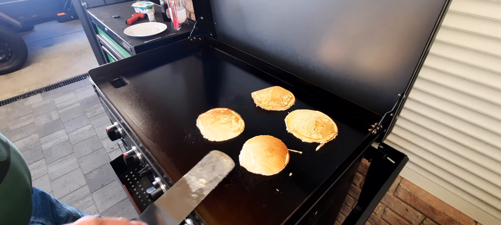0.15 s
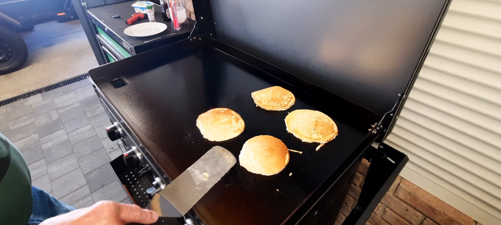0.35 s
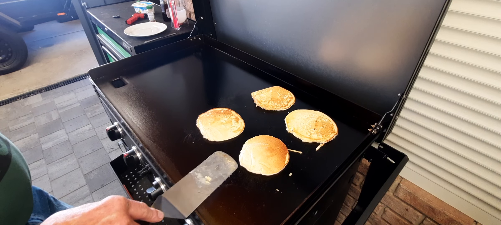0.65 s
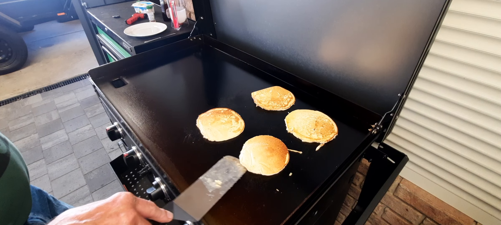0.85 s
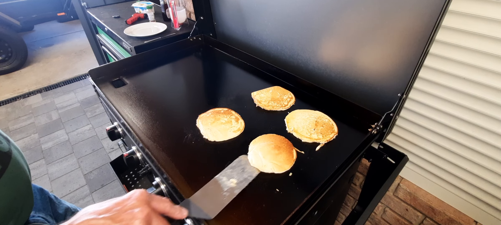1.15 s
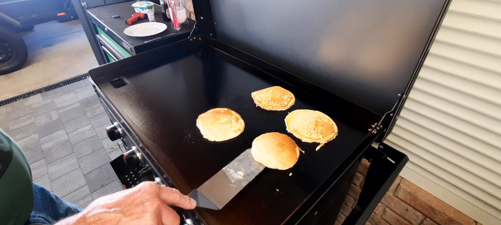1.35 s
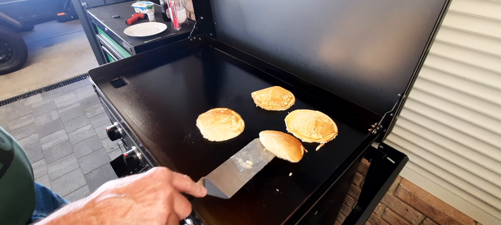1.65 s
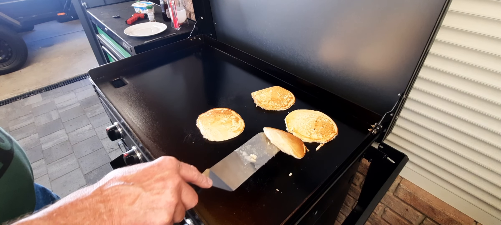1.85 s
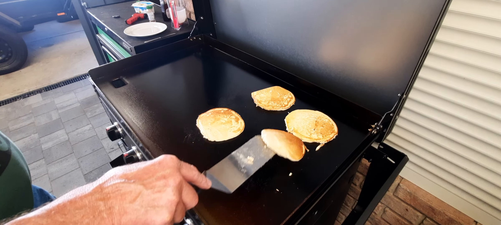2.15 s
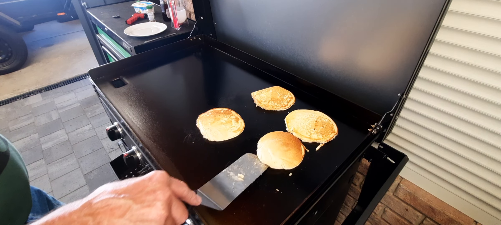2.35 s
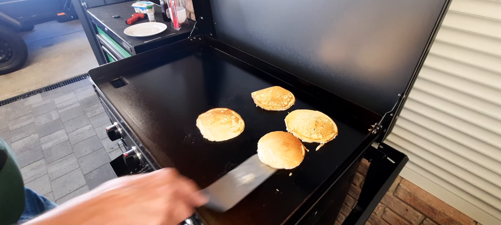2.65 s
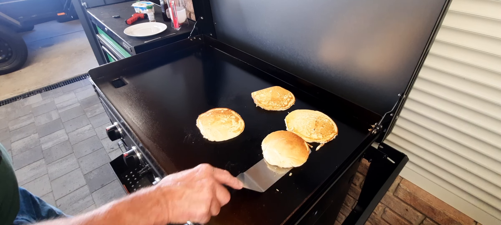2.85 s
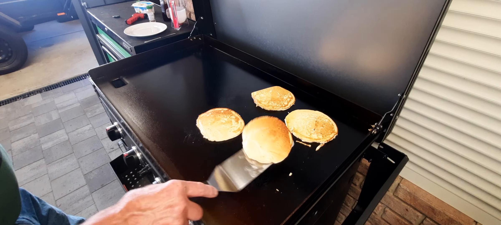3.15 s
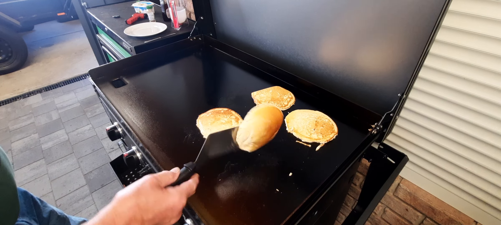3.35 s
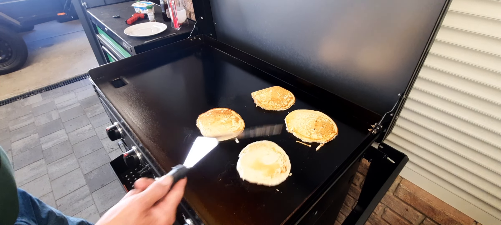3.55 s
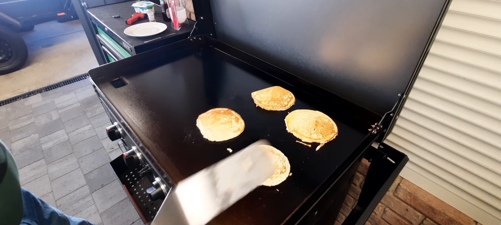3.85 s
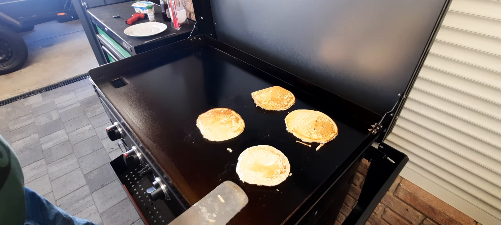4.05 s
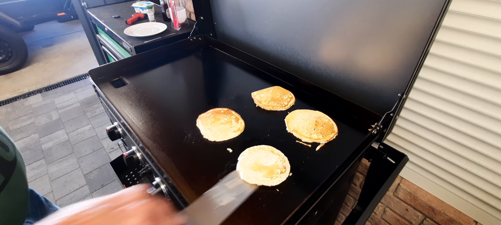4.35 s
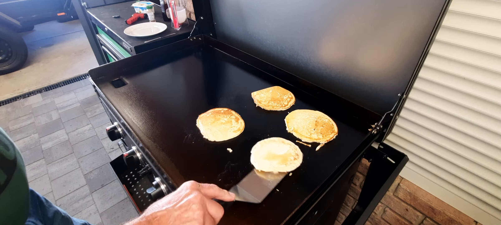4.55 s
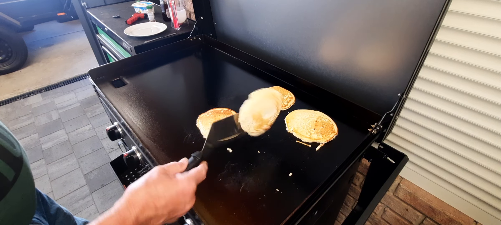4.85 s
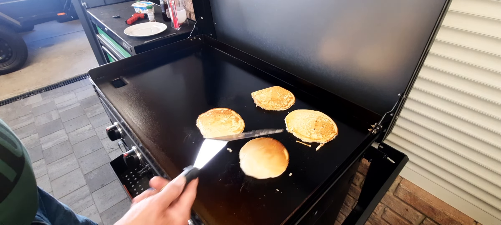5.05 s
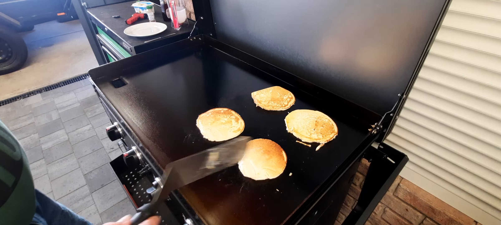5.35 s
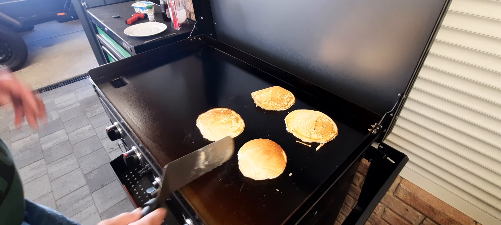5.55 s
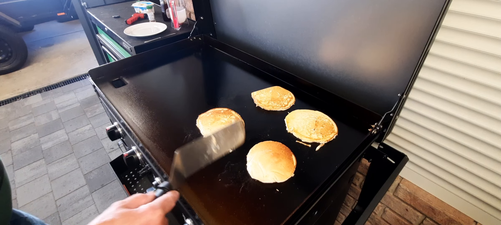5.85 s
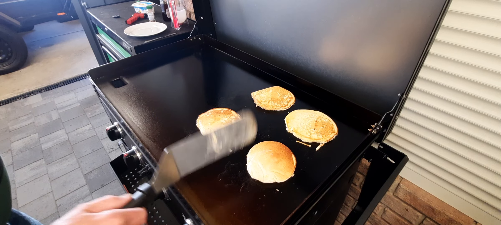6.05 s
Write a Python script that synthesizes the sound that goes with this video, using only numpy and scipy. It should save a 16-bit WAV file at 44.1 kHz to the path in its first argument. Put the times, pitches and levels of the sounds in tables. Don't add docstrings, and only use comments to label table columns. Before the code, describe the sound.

A close stereo pickup on a walled patio, leaning right. Gas burners run throughout, a quiet flickering low rumble with thin hiss and faint whistles. At 0.6 and 0.8 s a steel blade lands softly on the griddle plate, followed by faint drags until 1.3 s. Dull bun nudges pass near 1.7 and 2.0 s. At 2.36 s comes a very sharp steel tap, a lighter one at 2.44, then a bright gritty scrape at 2.7 with a short metallic ring and wall echo. A bun thuds faintly at 3.3 and slaps crisply at 3.56, settling softly to 4.0. A firm tap at 4.1 and a soft one at 4.26 precede two quick bright scrapes at 4.36 and 4.45, the second brightest. The loudest bun slap falls at 5.07. Around 5.5 a light touch, then the blade lands heavily flat and drags dully, fading by 6.1.

```python
import sys
import numpy as np
from scipy import signal
from scipy.fft import rfft, irfft, next_fast_len
from scipy.io import wavfile

SR = 44100
rng = np.random.default_rng(int(sys.argv[2]) if len(sys.argv) > 2 else 0)


def master_out(mix):
    frames = np.transpose(np.atleast_2d(mix))
    ceiling = np.clip(frames, -1, 1)
    pcm = np.round(ceiling * 32767).astype(np.int16)
    wavfile.write(sys.argv[1], SR, pcm)


def gain_from_decibels(decibels):
    exponent = np.asarray(decibels, float) / 20
    return 10 ** exponent


N = 273953
USUAL_DB = -50
LOAD_SWING = 0.41
CLICK_DB = 5.5


# start t/s, fastest t/s, end t/s, edge hiss level/dB, load on the plate level/dB
SLIDES = [
    (0.765, 0.796, 0.89, -54.5, -71),
    (0.82, 0.882, 0.93, -55, -72),
    (0.87, 1.05, 1.122, -58, -63),
    (1.18, 1.235, 1.292, -53, -51.5),
    (2.42, 2.441, 2.52, -64.5, -58.5),
    (2.5, 2.62, 3.105, -65.5, -59.5),
    (2.655, 2.72, 2.826, -24, -47),
    (4.24, 4.27, 5.63, -69.5, -71.5),
    (4.325, 4.36, 4.45, -30.5, -42),
    (4.385, 4.452, 4.51, -19, -43.5),
]
FLAT_DRAGS = [
    (5.57, 5.63, 5.74, -58.5, -40),
    (5.64, 5.74, 5.93, -57.5, -47.5),
    (5.85, 5.96, 6.16, -72, -63),
]
# level/dB, share of edge [1], share of load [1]
SLIDE_LAW = [(3, 0.76, 0.38), (2.5, 0.13, 0.96), (-9.5, -0.041, 0.53)]
FLAT_LAW = [(-7, 0.82, 1), (3, 0.15, 1), (-1.5, 0.15, 0.75)]


def blade_scrapes():
    sliding = strokes(SLIDES, SLIDE_LAW) + strokes(FLAT_DRAGS, FLAT_LAW) + chatter()
    judder_db = 2.5 * drift(rate=22)
    return rubbing(sliding * gain_from_decibels(judder_db), per_s=6000, low_hz=215.0)


# t/s, edge level/dB, load level/dB, chatter that follows t/s
STEEL_TAPS = [
    (0.5766, -47, -51.5, .14),
    (0.7655, -44, -67, .03),
    (2.3613, -20.5, -43, 0.094),
    (2.4354, -33, -66.5, 0.18),
    (4.0876, -26, -39.5, .15),
    (4.2642, -43.5, -47.5, 0.037),
    (5.565, -39.5, -31.5, 0.027),
]
# level/dB, share of edge [1], share of load [1]
TAP_LAW = [(5, 0.59, 0.35), (-0.5, .05, 0.98), (-7.5, 0.18, .15)]


def blade_taps():
    return gain_from_decibels(CLICK_DB) * blows(STEEL_TAPS, TAP_LAW, contact_s=0.0022, low_hz=252)


def chatter():
    rattle_s, drag_db, edge_cut_db = 0.0075, -28.5, -9.5
    gains = np.zeros((4, N))
    for s, edge_db, load_db, length in STEEL_TAPS:
        span, t, on = touching(s, s + length)
        under_db = 20 * np.log10(np.exp(-(t - s) / rattle_s) + gain_from_decibels(drag_db))
        edge = edge_db + edge_cut_db + under_db
        gains[:, span] += on * band_gains(edge, load_db + LOAD_SWING * under_db, SLIDE_LAW)
    return gains


PLATE_HZ = [288, 311, 410, 564, 760, 838, 1030, 1172, 1197, 1420, 1468, 1602, 1870, 1895]
# level/dB, time to fall 60 dB t/s
PLATE_MODES = [(-2, 1.4), (-4.5, 1), (-5, 0.39), (-1, 1.08), (-13, 0.13), (-8, 0.74), (-9, 1.05),
               (-3.5, 0.51), (-8, 0.83), (-9.5, 0.39), (-3.5, 0.54), (-3, .3), (0, .3), (-5, 0.59)]
BLADE_HZ = [2030, 2110, 2378, 2520, 2815, 3120, 3425, 3830, 4592, 5430, 6085, 6308, 6700, 11750]
# level/dB, time to fall 60 dB t/s
BLADE_MODES = [(-6.5, 0.62), (-7, 0.9), (-6.5, 0.53), (-8.5, 0.57), (-11, 0.43), (-1.5, 0.25), (-2, 0.19),
               (-4, 0.37), (-1, 0.2), (-14.5, .2), (-3, .12), (9, 0.11), (4, 0.32), (-7, .13)]
# f/Hz, left over right level/dB
PLATE_BALANCE = [(60, -5), (110, 2), (200, -15), (380, -6.5), (700, -8.5), (1290, -8), (2380, -9),
                 (4400, -11), (8120, -12), (15000, -39)]


def steel_modes(force, wander_db, free_db):
    pressed_share = 0.19
    flat_from_s, flat_above_hz, flat_db = 5.56, 450, -21
    stifled = gain_from_decibels(flat_db * (np.arange(N) / SR > flat_from_s))
    out = np.zeros((2, N))
    for hz, (level_db, t60) in zip(PLATE_HZ + BLADE_HZ, PLATE_MODES + BLADE_MODES):
        wander = wander_db * min(1, hz / 1500) * drift(9)
        drive = force * gain_from_decibels(level_db + wander)
        free_drive = drive * stifled if hz > flat_above_hz else drive
        tone = ring(drive, hz, t60 * pressed_share) + gain_from_decibels(free_db) * ring(free_drive, hz, t60)
        lean_db = at_hz(PLATE_BALANCE, hz) + rng.normal(0, 1.4)
        left = np.roll(tone, rng.integers(-8, 4))
        out += [left * gain_from_decibels(lean_db / 2), tone * gain_from_decibels(-lean_db / 2)]
    return out


# f/Hz, level/dB per Hz
PLATE_COLOUR = [(200, 3), (720, -2.5), (2300, -2), (5100, -0.5), (6500, 4), (8300, -2.5), (11500, 4.5),
                (16000, -2)]
# f/Hz, time to fall 60 dB t/s
PLATE_T60 = [(150, .5), (500, .6), (1000, .5), (2000, .36), (4000, .28), (8000, .21), (14000, .15)]
# f/Hz, likeness [-1..1]
PLATE_LIKENESS = [(60, 0.37), (130, -1.7), (290, -0.27), (640, 0.085), (1410, 0.18), (3100, 0.69),
                  (6820, 1), (15000, 1)]


def plate(force, prompt_t60, tail_db):
    size = 2 ** 15
    t, hz = np.arange(size) / SR, np.fft.rfftfreq(size, 1 / SR)
    noise = stereo_noise(size, lambda f: at_hz(PLATE_COLOUR, f), PLATE_LIKENESS, PLATE_BALANCE)
    centres = np.log2(np.array(PLATE_T60)[:, 0])
    prompt = gain_from_decibels(-60 * t / prompt_t60)
    response = 0
    for k, (_, t60) in enumerate(PLATE_T60):
        share = np.interp(np.log2(hz + 1), centres, np.arange(len(centres)) == k)
        tail = gain_from_decibels(tail_db - 60 * t / t60)
        response = response + irfft(noise * share, size) * (prompt + tail)
    response = response / np.sqrt(np.sum(response.mean(0) ** 2))
    return signal.fftconvolve(force[None], response, axes=1)[:, :N]


# t/s, crisp edge level/dB, load level/dB
BUN_SLAPS = [
    (3.3034, -62, -55),
    (3.497, -45.5, -71),
    (3.5573, -30.5, -49),
    (3.8024, -66, -60),
    (4.0018, -63, -56.5),
    (5.034, -42.5, -54),
    (5.0714, -28, -35),
    (5.4792, -43.5, -95),
    (5.529, -68, -61),
]
# level/dB, share of edge [1], share of load [1]
SLAP_LAW = [(-8, 1.11, 0.042), (-9.5, 0.85, 0.35), (6, .05, .95)]


def bun_slaps():
    return blows(BUN_SLAPS, SLAP_LAW, contact_s=0.00095, low_hz=125)


# start t/s, fastest t/s, end t/s, edge level/dB, load level/dB
NUDGES = [
    (1.68, 1.73, 1.75, -72.5, -55),
    (1.94, 1.97, 2.02, -83, -51.5),
    (1.99, 2.036, 2.18, -68.5, -75),
    (3.495, 3.54, 3.51, -48, -58),
    (5.035, 5.062, 5.072, -61, -52.5),
    (5.47, 5.485, 5.947, -71, -69.5),
]
# level/dB, share of edge [1], share of load [1]
NUDGE_LAW = [(-2.3, 0.72, 0.17), (-1.2, 0.62, 0.35), (1, 0.053, 0.98)]


def bun_nudges():
    return rubbing(strokes(NUDGES, NUDGE_LAW), per_s=3600, low_hz=123.3)


# f/Hz, level/dB, time to fall 60 dB t/s
THUD_MODES = [(161.8, -2, 0.46), (301, -7, 0.688), (424, -4.5, 0.28), (623, 1.5, 0.061), (842, 3.5, 0.05),
              (2220, -44, 0.046)]


def bun_thud(slap):
    return sum(gain_from_decibels(db - 38.5) * ring(slap, hz, t60) for hz, db, t60 in THUD_MODES)


# f/Hz, level/dB per Hz
BURNER = [(15, -51), (25, -22.5), (76, -3.5), (127, -9), (242, -6.5), (405, -10), (451, -17), (560, -9),
          (607, -8.5), (1020, -18.5), (1560, -25.5), (2350, -17.5), (3520, -27), (7710, -24), (16000, -23)]
# f/Hz, width f/Hz, level/dB over the noise
BURNER_PEAKS = [(90.5, 100, 5), (163.1, 27, 12.5), (232, 62, 8), (328.5, 64, 13.5), (2160, 200, 3.5),
                (5096, 520, 10), (7767, 290, 18.5), (10200, 260, 2.5), (13800, 500, 5.5)]
# f/Hz, likeness [-1..1]
BURNER_LIKENESS = [(60, 0.89), (130, 0.36), (290, 1), (640, -0.78), (1410, -0.5), (3100, -0.084),
                   (6820, -1.5), (15000, -2.2)]
# f/Hz, left over right level/dB
BURNER_BALANCE = [(60, -12), (110, -6), (200, -14.5), (380, -16), (700, -13), (1290, -5), (2380, -10),
                  (4400, -6.5), (8120, -16), (15000, -28.5)]
# t/s, level/dB
FLAME = [(0.0, -66.5), (0.69, -72), (0.9, -58.5), (1.14, -64.5), (1.43, -67.5), (2.37, -66.5), (2.72, -61),
         (3.13, -67.5), (3.49, -66.5), (3.74, -68), (4.46, -63), (4.91, -66.5), (5.9, -69), (6.21, -63.5)]


def burner(level_db, flicker_db):
    def colour(f):
        peaks = sum(db / (1 + (2 * (f - top) / width) ** 2) for top, width, db in BURNER_PEAKS)
        return at_hz(BURNER, f) + peaks

    size = next_fast_len(N)
    hz = np.fft.rfftfreq(size, 1 / SR)
    noise = stereo_noise(size, colour, BURNER_LIKENESS, BURNER_BALANCE)
    low = 1 / (1 + (hz / 900) ** 4)
    rumble = irfft(noise * low, size)[:, :N]
    hiss = irfft(noise * (1 - low), size)[:, :N]
    s, flame_db = np.transpose(FLAME)
    slow_db = np.interp(np.arange(N) / SR, s, flame_db - flame_db.mean())
    flame = gain_from_decibels(slow_db + flicker_db * drift(15))
    loudness = np.sqrt(np.mean((rumble + hiss).mean(0) ** 2))
    return gain_from_decibels(level_db) * (rumble * flame + hiss) / loudness


def blows(rows, law, contact_s, low_hz):
    force, size = np.zeros(N), 2048
    for s, edge_db, load_db, *_ in rows:
        contact = 0.16 * rng.standard_normal(size) * np.exp(-np.arange(size) / SR / contact_s)
        contact[0] = 1
        burst = four_bands(contact, low_hz)
        at = round(s * SR)
        force[at:at + size] += band_gains(edge_db, load_db, law) / np.abs(burst).max(1) @ burst
    return force


def strokes(rows, law):
    start_db, end_db = -28, -27.5
    gains = np.zeros((4, N))
    for start, fastest, end, edge_db, load_db in rows:
        span, t, on = touching(start, end)
        swell = np.clip((fastest - t) / (fastest - start), 0, 1)
        fade = np.clip((t - fastest) / (end - fastest), 0, 1)
        under_db = start_db * swell ** 2.32 + end_db * fade ** 1.16
        gains[:, span] += on * band_gains(edge_db + under_db, load_db + LOAD_SWING * under_db, law)
    return gains


def touching(start, end):
    span = slice(round(start * SR), round(end * SR))
    t = np.arange(span.start, span.stop) / SR
    return span, t, np.clip(np.minimum(t - start, end - t) / 0.0083, 0, 1)


def rubbing(gains, per_s, low_hz):
    sizes = gain_from_decibels(3 * np.minimum(rng.exponential(1, N), 4)) * rng.choice([-1, 1], N)
    catches = rng.random(N) < per_s / SR
    grit = four_bands(catches * sizes, low_hz)
    return np.sum([g * rms_one(b) for g, b in zip(gains, grit)], axis=0)


def four_bands(x, low_hz):
    cuts = [(4500, "high"), ([1700, 4500], "band"), ([700, 1700], "band"), ([low_hz, 700], "band")]
    bands = []
    for k, (hz, kind) in enumerate(cuts):
        sos = signal.butter(2, hz, kind, fs=SR, output="sos")
        bands.append((-1) ** k * signal.sosfilt(sos, x + 1e-18))
    return np.array(bands)


def band_gains(edge_db, load_db, law):
    edge, load = edge_db - USUAL_DB, load_db - USUAL_DB
    return gain_from_decibels(np.array([edge_db] + [USUAL_DB + db + a * edge + b * load for db, a, b in law]))


def ring(force, hz, t60):
    r, w = gain_from_decibels(-60 / (t60 * SR)), 2 * np.pi * hz / SR
    return signal.lfilter([0, np.sin(w)], [1, -2 * r * np.cos(w), r * r], force)


def stereo_noise(size, gain_db, likeness, balance):
    hz = np.fft.rfftfreq(size, 1 / SR)
    mid, side = rfft(rng.standard_normal((2, size)))
    alike = np.clip(at_hz(likeness, hz), -.99, .99)
    pair = np.sqrt(1 + alike) * mid + np.sqrt(1 - alike) * side * [[1], [-1]]
    lean = gain_from_decibels(at_hz(balance, hz) / 2 * np.array([[1], [-1]]))
    return pair * lean / lean.mean(0) * gain_from_decibels(gain_db(hz))


def drift(rate):
    steps = rng.standard_normal(int(60 * N / SR) + 2)
    r = np.exp(-2 * np.pi * rate / 60)
    slow = rms_one(signal.lfilter([1], [1, -r], steps))
    return np.interp(np.arange(N) * 60 / SR, np.arange(len(steps)), slow)


def at_hz(points, hz):
    f, value = np.transpose(points)
    return np.interp(np.log(hz + 1), np.log(f), value)


def rms_one(x):
    return x / np.sqrt(np.mean(x ** 2) + 1e-20)


def scene():
    steel = blade_scrapes() + blade_taps()
    rings = steel_modes(steel, wander_db=5.5, free_db=-14.5)
    slap = bun_slaps()
    buns = bun_nudges() + gain_from_decibels(CLICK_DB) * slap
    body = plate(steel + gain_from_decibels(1.0) * buns, prompt_t60=0.025, tail_db=2)
    direct = (slap + bun_thud(slap)) * gain_from_decibels([[-6], [3]])
    flames = burner(level_db=-60, flicker_db=2.55)
    return gain_from_decibels(-3) * body + gain_from_decibels(-42) * rings + direct + flames


def band_limit(x):
    return signal.sosfilt(signal.butter(12, 16640, fs=SR, output="sos"), x)


def record(dry):
    top_cut = signal.cheby2(12, 60, 16640, fs=SR, output="sos")
    mix = signal.sosfilt(top_cut, dry)
    return band_limit(mix)


dry = scene()
out = record(dry)
master_out(out)
```